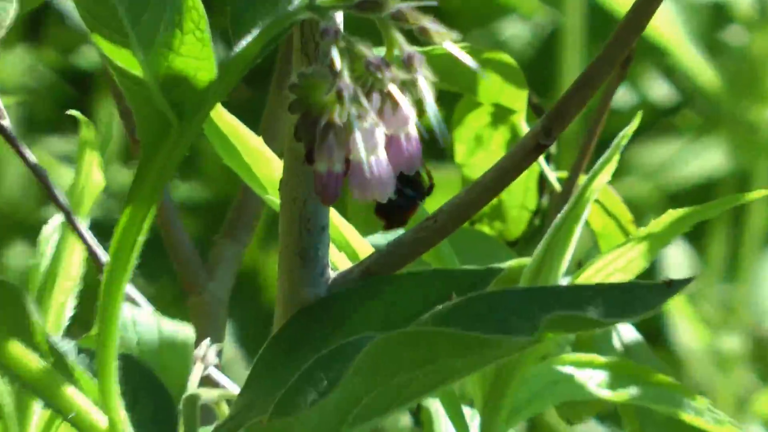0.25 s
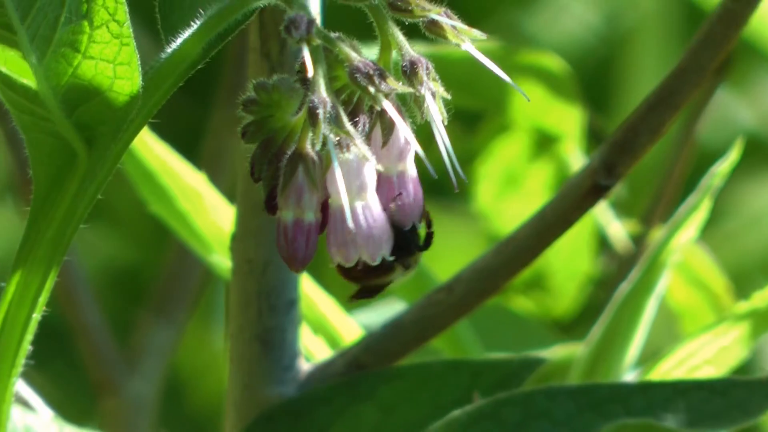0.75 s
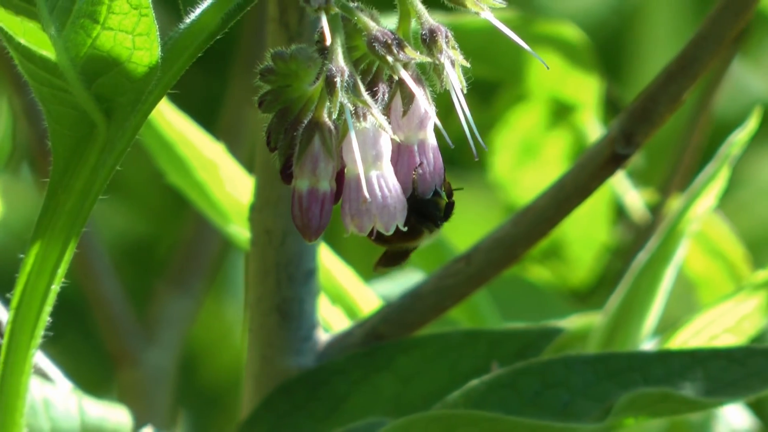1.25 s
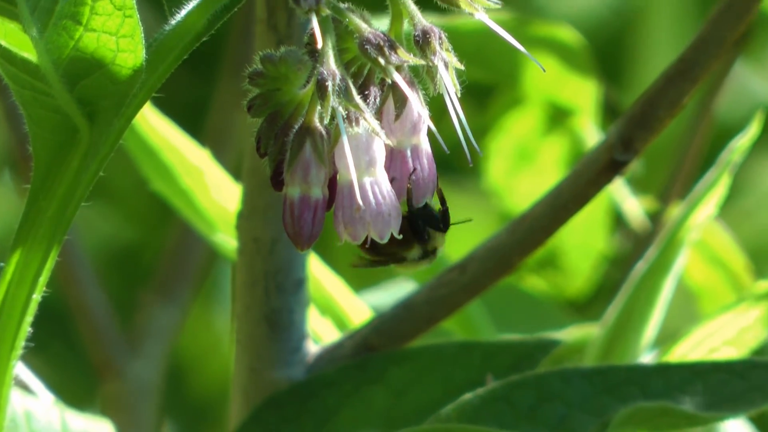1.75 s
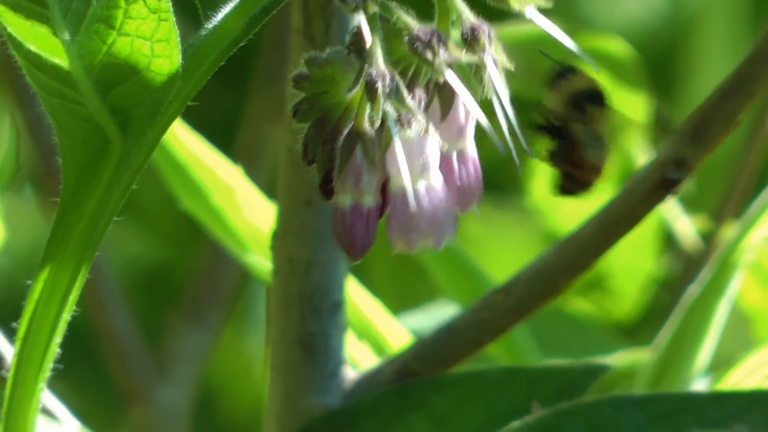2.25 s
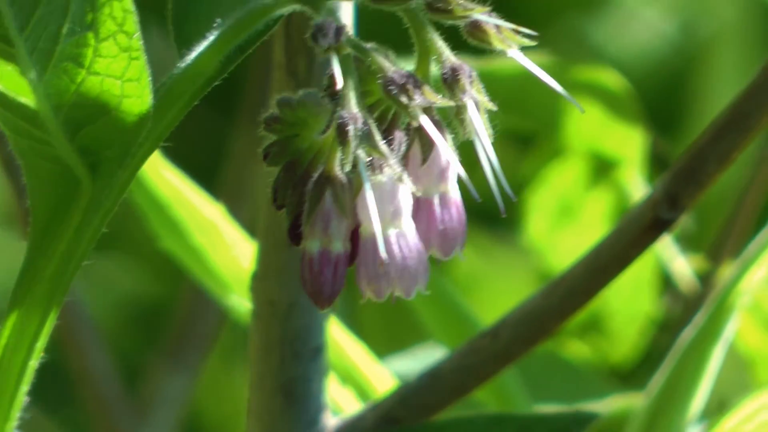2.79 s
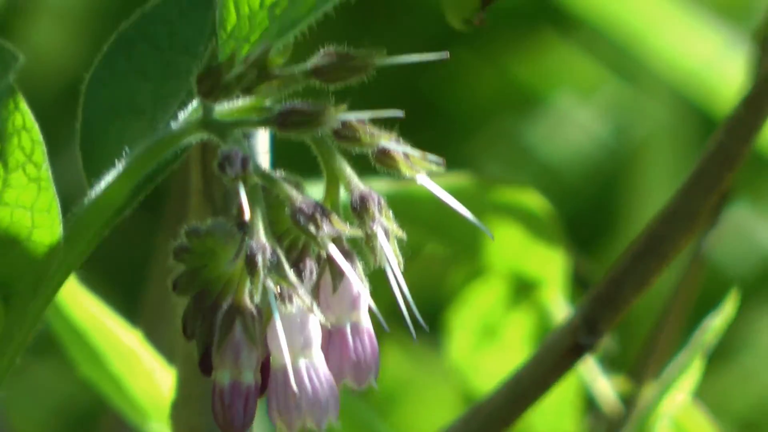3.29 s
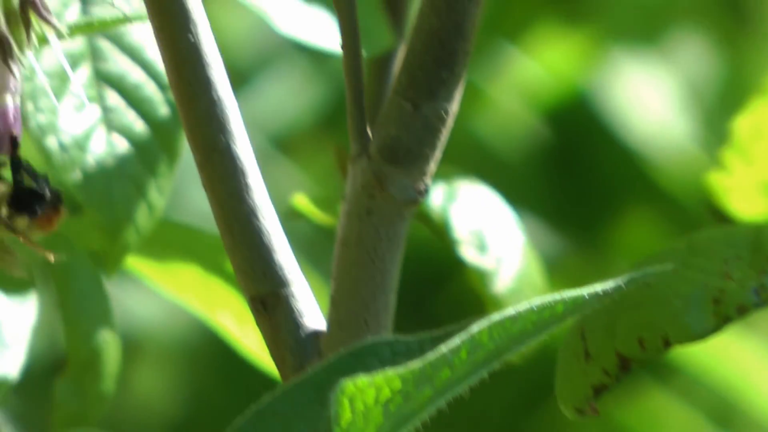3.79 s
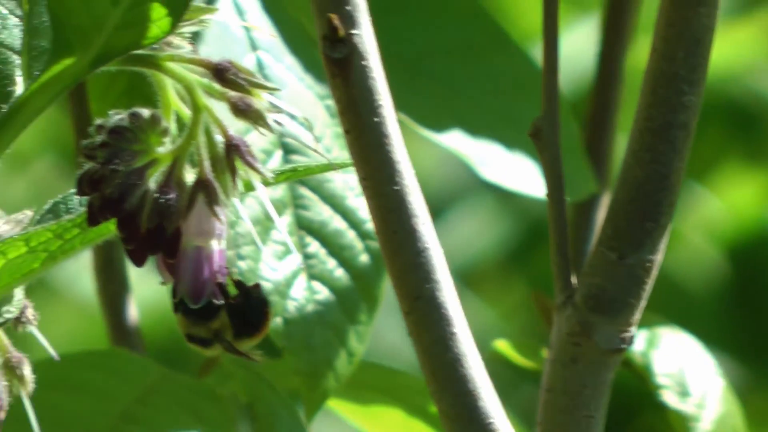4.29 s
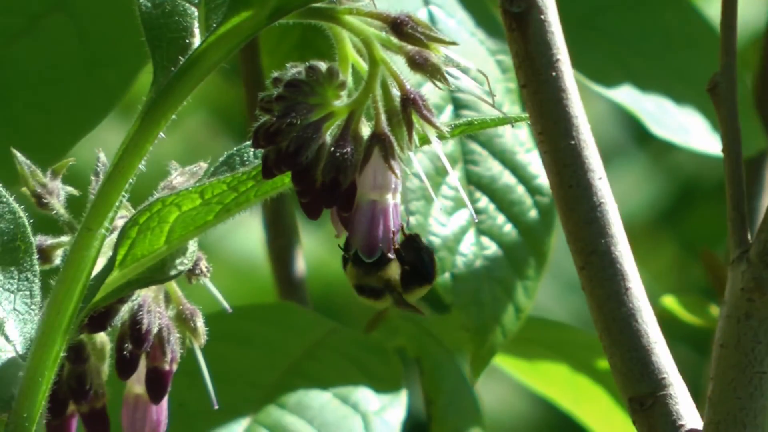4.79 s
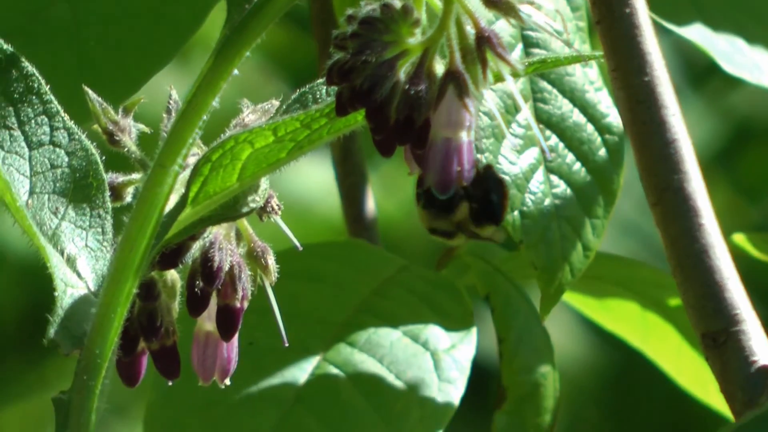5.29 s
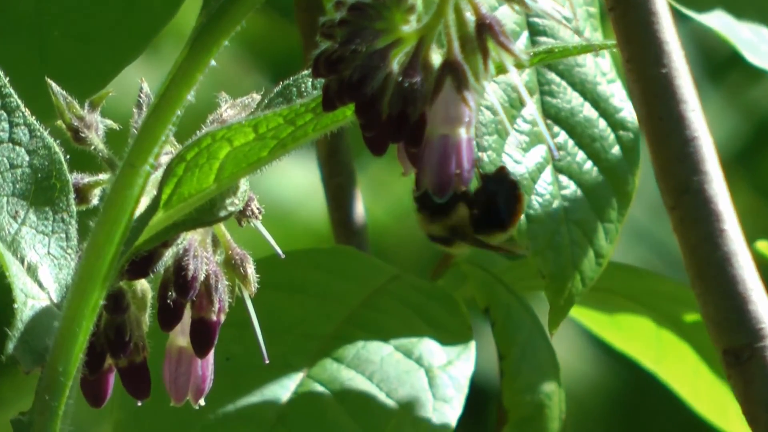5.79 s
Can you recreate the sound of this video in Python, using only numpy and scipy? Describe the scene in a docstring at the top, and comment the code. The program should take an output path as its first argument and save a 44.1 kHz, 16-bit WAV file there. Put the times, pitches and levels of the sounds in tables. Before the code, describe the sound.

Bumblebee wings hum in near-pure tones, flight after flight, while a small bird warbles quick whistles on the right and leaves rustle.

```python
"""A flower garden: bumblebees hum in one flight after another, their wings sounding almost pure tones.
A small bird warbles in gliding whistles on the right and others answer from further off;
the foliage scatters their notes into many small echoes. Petals and leaves rustle as bursts of uneven snaps.
Under it all lie a distant rumble with faint tones in it, and the soft hiss of open air, both shaped from noise."""
import sys
import numpy as np
from scipy import signal
from scipy.fft import rfft, irfft, next_fast_len
from scipy.io import wavfile

SR = 44100
rng = np.random.default_rng(int(sys.argv[2]) if len(sys.argv) > 2 else 0)


def to_wav(sig):
    """Store sig (one row per channel, or 1-D mono) as 16-bit WAV at the path in sys.argv[1].

    Samples outside -1..1 are clipped; the rate is SR.
    """
    pcm = np.clip(np.atleast_2d(sig), -1, 1) * 32767
    pcm = np.round(pcm).astype(np.int16)
    wavfile.write(sys.argv[1], SR, pcm.T)  # frames by channels


N = 266540
TIME = np.arange(N) / SR   # s


def from_db(db):
    """Logarithmic level: decibels to amplitude gain."""
    return 10 ** (np.asarray(db) / 20)


def rms_one(x):
    """Power normalisation: scale to an rms of one."""
    return x / np.sqrt(np.mean(x ** 2) + 1e-20)


def in_time(rows):
    """Linear interpolation: the columns of a curve, at every sample."""
    seconds, *columns = np.transpose(rows)
    return [np.interp(TIME, seconds, column) for column in columns]


def at_hz(rows, hz):
    """Logarithmic frequency scale: the columns of a spectrum, joined along it."""
    points, *columns = np.transpose(rows)
    return [np.interp(np.log(hz + 1), np.log(points), column) for column in columns]


def drift(rate):
    """Low-passed noise: smooth chance that turns about rate times a second, with an rms of one."""
    size = next_fast_len(N, True)
    hz = np.fft.rfftfreq(size, 1 / SR)
    spectrum = rfft(rng.standard_normal(size)) * np.exp(-(hz / rate) ** 2)
    return rms_one(irfft(spectrum, size)[:N])


def span(start, length):
    """Normalised time: the samples of an event and its progress from 0 to 1."""
    at = np.flatnonzero((TIME >= start) & (TIME < start + length))
    return at, (TIME[at] - start) / length


# Harmonic series of a hum: (multiple of the fundamental, level/dB)
HARMONICS = [(1, 1.5), (2, -28), (3, -31), (4, -27)]


def hum(fundamental_hz, waver):
    """Harmonic synthesis: a slightly unsteady tone, almost a sine, with weak overtones."""
    unsteady_hz = fundamental_hz * (1 + waver * drift(24.6))
    phase = 2 * np.pi * np.cumsum(unsteady_hz) / SR
    out = np.zeros(N)
    for multiple, level_db in HARMONICS:
        out += from_db(level_db) * np.sin(multiple * phase + rng.uniform(0, 2 * np.pi))
    return np.sqrt(2) * out


def flight(track, trim_db, fade_s):
    """Amplitude and frequency modulation: one bee's hum follows its wingbeat and nearness, faded at the ends."""
    beat_hz, level_db = in_time(track)
    outside_s = np.maximum(track[0][0] - TIME, TIME - track[-1][0])
    fade = np.clip(1 - outside_s / fade_s, 0, 1)
    return from_db(level_db + trim_db) * fade * hum(beat_hz, waver=0.0026)


# Wing hum along each flight: (t/s, wingbeat f/Hz, level/dB before the flight's trim)
HIGH_FLIGHT = [(0.0, 180.9, -27.5), (0.56, 181.2, -39), (0.688, 181, -32), (0.878, 181.7, -43),
               (1.072, 179.8, -35.5), (1.1, 179.6, -54)]
RISING_FLIGHT = [(1.27, 138.2, -45), (1.362, 137.7, -32.5), (1.688, 145.1, -42), (1.81, 148, -31),
                 (1.82, 147.7, -56)]
TAKE_OFF = [(1.96, 152.9, -43), (1.974, 153, -31), (2.17, 151.5, -39)]
LOW_FLIGHT = [(2.62, 116.3, -43), (2.712, 116, -36), (2.858, 116.6, -37), (2.972, 111, -41),
              (3.226, 112.4, -52), (3.292, 105.2, -34), (3.396, 102.4, -49.5), (3.552, 98.56, -38),
              (3.986, 100.7, -33.5), (4.308, 99.5, -36), (4.448, 97.1, -34), (4.48, 97, -51)]


def bees():
    """Periodic air displacement: beating wings push the air back and forth, a little to the right."""
    wings = flight(HIGH_FLIGHT, trim_db=-.5, fade_s=.07)
    wings += flight(RISING_FLIGHT, trim_db=-4.0, fade_s=0.075)
    wings += flight(TAKE_OFF, trim_db=-2.5, fade_s=.04)
    wings += flight(LOW_FLIGHT, trim_db=-1.0, fade_s=0.059)
    return np.outer(from_db([-3, 0]), wings)


FALL_CURVE = 2.5   # power of the progress


def fall(u):
    """Accelerating glide: level at first, then ever steeper."""
    return u ** FALL_CURVE


def slide(u):
    """Linear glide: the pitch moves evenly."""
    return u


SWOOP_SHARE = .7   # share of the length spent moving


def swoop(u):
    """Saturating glide: a quick move that levels out."""
    return np.sin(np.pi / 2 * np.minimum(u / SWOOP_SHARE, 1)) ** 2


DIP_TURN, DIP_BACK = .36, .78   # shares of the length at the far pitch and at the fullest recovery
DIP_REST = .22                  # share of the depth that stays at the recovery


def dip(u):
    """Reversing glide: straight to the far pitch, a rounded return most of the way, then a sag."""
    recovery = np.sin(np.pi / 2 * (u - DIP_TURN) / (DIP_BACK - DIP_TURN))
    return np.where(u < DIP_TURN, u / DIP_TURN, 1 - (1 - DIP_REST) * recovery)


def arch(u):
    """Half-sine glide: up and back again."""
    return np.sin(np.pi * u)


CHIP_CURVE = 1.45   # power of the progress


def chip(u):
    """Accelerating glide: a rise that steepens."""
    return u ** CHIP_CURVE


LOUDEST = .57   # share of a note's length before its loudest point


def whistles(syllables, flutter_db, waver, peakiness):
    """Frequency modulation: each note is a pure tone gliding along its contour, swelling and dying away."""
    out = np.zeros(N)
    flutter = from_db(flutter_db * drift(220))
    wobble = 1 + waver * drift(230)
    for contour, notes in syllables:
        for start, length, from_hz, to_hz, level_db in notes:
            at, u = span(start, length)
            hz = (from_hz + (to_hz - from_hz) * contour(u)) * wobble[at]
            tone = np.sin(2 * np.pi * np.cumsum(hz) / SR)
            swell = np.sin(np.pi / 2 * np.interp(u, [0, LOUDEST, 1], [0, 1, 0]))
            out[at] += from_db(level_db) * rms_one(swell ** peakiness * flutter[at] * tone)
    return out


def foliage(x, t60, count):
    """Multiple scattering: stems and leaves return many small decaying echoes, different ones to each ear."""
    ears = []
    for ear in range(2):
        delay_s = rng.uniform(0.0036, .5, count)
        size = rng.standard_normal(count)
        echoes = np.zeros(SR)
        echoes[(delay_s * SR).astype(int)] = size * from_db(-60 * delay_s / t60)
        ears.append(signal.fftconvolve(x, echoes / np.linalg.norm(echoes))[:N])
    return np.array(ears)


# Near bird's syllables by contour:
# (t/s, length/s, first f/Hz, f/Hz the contour heads for, level/dB before the ear gains)
FALLS = [(.118, .042, 4400, 3050, -39), (.238, .037, 4680, 4000, -41.5), (.275, .027, 4480, 4200, -40),
         (.515, .035, 4000, 2700, -39), (.57, .02, 3000, 2100, -41), (5.153, .036, 3430, 2100, -40),
         (5.603, .041, 3850, 3020, -34.3), (5.806, .044, 3980, 3000, -33.5),
         (5.906, .044, 3920, 2480, -33.7)]
SLIDES = [(.052, .028, 3850, 4500, -44), (.158, .025, 3700, 4000, -41), (.362, .036, 2880, 3700, -37),
          (.472, .022, 3750, 5100, -45), (.594, .041, 2900, 3880, -36), (.718, .017, 4100, 5450, -43.5),
          (.788, .02, 2870, 3250, -42), (.815, .032, 4650, 3250, -37), (5.466, .036, 2130, 3280, -35),
          (5.498, .024, 3200, 2100, -35), (5.516, .02, 3150, 2300, -37.5), (5.978, .077, 2520, 2920, -31)]   # most of them upwards
SWOOPS = [(.49, .027, 4750, 3990, -36), (.729, .027, 5450, 3950, -37), (5.233, .035, 2900, 3830, -36.5)]
DIPS = [(5.35, .054, 3720, 2980, -35), (5.69, .052, 3250, 2520, -31.5)]
# Strength of all its reflected sound, from deep in the leaves to an open perch: (t/s, level/dB)
COVER = [(1, 1.5), (5, -2)]
# Its distinct reflections: (delay t/s, left level/dB, right level/dB), on top of the cover
REFLECTIONS = [(.023, -13, -9), (.047, -15, -8)]


def near_bird():
    """Direct and reflected sound: two quick warbled phrases, two reflections and a scattered tail."""
    syllables = [(fall, FALLS), (slide, SLIDES), (swoop, SWOOPS), (dip, DIPS)]
    song = whistles(syllables, flutter_db=2.3, waver=.005, peakiness=1.1)
    direct = np.outer(from_db([-1.5, 3]), song)
    returned = song * from_db(in_time(COVER)[0])
    reflected = np.zeros((2, N))
    for delay_s, *ears_db in REFLECTIONS:
        late = np.interp(TIME - delay_s, TIME, returned, left=0)
        reflected += np.outer(from_db(ears_db), late)
    tail = from_db([[-10], [-.5]]) * foliage(returned, t60=.7, count=600)
    return direct + reflected + tail


# Far birds' low warbles: (t/s, length/s, first f/Hz, f/Hz the contour heads for, level/dB before the ear gains)
FAR_DIPS = [(3.392, .075, 2880, 2200, -48.5), (3.512, 0.069, 2903, 2356, -47)]
FAR_SWOOPS = [(3.106, .029, 4740, 3150, -47), (3.883, .075, 2850, 2150, -46), (4.018, .06, 2490, 2165, -47),
              (4.495, 0.039, 2680, 2480, -48), (4.55, .075, 2830, 2173, -47.5),
              (4.693, 0.036, 2650, 2530, -49.5), (.486, .06, 2540, 2400, -49.5),
              (.895, .045, 2740, 2596, -47.5)]
# Notes that rise and sink back: (t/s, length/s, top f/Hz, level/dB before the ear gains)
ARCHES = [(.03, 0.034, 2240, -57), (0.339, 0.057, 2530, -44.5), (.975, .06, 2980, -55),
          (1.59, 0.056, 5550, -56.5), (3.339, 0.06, 2744, -49), (3.494, 0.056, 2945, -54),
          (3.85, 0.053, 2790, -51.5), (4.748, .06, 4330, -47), (4.907, 0.047, 4005, -46),
          (5.033, 0.064, 4350, -45), (5.036, 0.057, 4140, -49)]
ARCH_DEPTH = 0.078   # share of the top pitch by which both ends lie lower
# Short rising chips: (t/s, first f/Hz, level/dB before the ear gains)
CHIPS = [(1.747, 4070, -51.5), (1.863, 4000, -50.5), (1.978, 3800, -49), (2.106, 3900, -49.5),
         (4.45, 4880, -53), (4.592, 4100, -49), (4.64, 3650, -49), (4.699, 3760, -50), (4.876, 4050, -54)]
CHIP_S, CHIP_RISE = 0.0304, 0.184   # length in s; rise as a share of the first pitch
# A thin repeated whistle: (t/s, length/s, first f/Hz, level/dB before the ear gains)
PIPES = [(2.44, 0.063, 3710, -53.5), (2.77, 0.18, 3720, -54.5), (3.115, .04, 3680, -52),
         (3.169, .07, 3607, -48.5), (3.268, .06, 3130, -54), (3.92, .1, 3640, -59), (4.26, .3, 3620, -59)]
PIPE_SAG_HZ_PER_S = 660


def far_birds():
    """Reverberant blurring: echoes smear low warbles, arched notes, chips and a thin, slightly sagging whistle."""
    arches = [(s, length, top * (1 - ARCH_DEPTH), top, db) for s, length, top, db in ARCHES]
    chips = [(s, CHIP_S, hz, hz * (1 + CHIP_RISE), db) for s, hz, db in CHIPS]
    pipes = [(s, length, hz, hz - PIPE_SAG_HZ_PER_S * length, db) for s, length, hz, db in PIPES]
    syllables = [(dip, FAR_DIPS), (swoop, FAR_SWOOPS), (arch, arches), (chip, chips), (slide, pipes)]
    song = whistles(syllables, flutter_db=1.0, waver=.002, peakiness=.45)
    echoes = from_db([[-6], [6.5]]) * foliage(song, t60=0.57, count=700)
    return np.outer(from_db([-2, 9.3]), song) + echoes


# One thin dipping call: (t/s, length/s, first f/Hz, lowest f/Hz, level/dB before the ear gains)
HIGH_CALL = [(2.4, 0.045, 7330, 6700, -33.5)]


def high_call():
    """Absorption: one thin note far to the right, whose echoes the leaves soak up quickly."""
    call = whistles([(dip, HIGH_CALL)], flutter_db=0.0, waver=.012, peakiness=0.81)
    echoes = from_db([[-19], [-10]]) * foliage(call, t60=.22, count=200)
    return np.outer(from_db([-20, -2]), call) + echoes


# Rustles of petals and leaves: (t/s, length/s, level/dB before the ear gains, tilt/dB per octave above 1 kHz)
RUSTLES = [(.204, .0076, -38.5, 4), (.213, .02, -42.5, 3), (0.724, 0.017, -43, 2), (1.28, 0.072, -45, -9),
           (1.429, .035, -49, -2), (1.55, .068, -43, -6), (1.661, 0.071, -40, -7), (1.775, .045, -48, 2),
           (2.19, .015, -49, 9), (2.238, .028, -46, 14), (2.295, .01, -48, 7), (5.052, 0.083, -45, -8),
           (5.443, .036, -47, -1), (5.885, 0.21, -41.5, -13)]
# Their common spectrum, before each one's tilt: (f/Hz, relative level/dB per Hz)
RUSTLE_COLOUR = [(600, -35), (2000, -25), (4500, 10), (7500, 9.5), (11000, 3.5), (15500, -14)]
RUSTLE_ATTACK = 0.44   # below 1, a rustle peaks early and trails off


def rustles(grain_db):
    """Frictional noise: brief brushes of leaf and petal as tiny uneven snaps, some duller and some airier."""
    out, size = np.zeros((2, N)), SR // 4
    hz = np.fft.rfftfreq(size, 1 / SR)
    colour_db, = at_hz(RUSTLE_COLOUR, hz)
    octaves = np.log2(np.maximum(hz, 1000))
    snaps = rms_one(rng.standard_normal((2, N)) * from_db(grain_db * drift(500)))
    for start, length, level_db, tilt_db in RUSTLES:
        at, u = span(start, length)
        colour = rms_one(from_db(colour_db + tilt_db * octaves))
        burst = irfft(rfft(snaps[:, at], size) * colour, size)[:, :len(at)]
        out[:, at] += from_db(level_db) * np.sin(np.pi * u ** RUSTLE_ATTACK) * burst
    return from_db([[-2.5], [1.5]]) * out


# Faint tones in the distant rumble: (t/s, length/s, f/Hz, level/dB before the overtone and ear gains)
FAR_DRONES = [(-0.27, 1.38, 205, -42), (-0.55, 1.14, 56, -46), (-0.44, 1.83, 124, -43), (2, 2.1, 333, -51),
              (3.5, 0.974, 204, -43)]
DRONE_FADE = 0.76   # power of the half-sine swell


def far_drones():
    """Amplitude modulation: faint hums that swell and fade in the distant rumble."""
    out = np.zeros(N)
    for start, length, hz, level_db in FAR_DRONES:
        at, u = span(start, length)
        swell = np.abs(np.sin(np.pi * u)) ** DRONE_FADE
        out[at] += from_db(level_db) * swell * hum(hz, waver=0.01823)[at]
    return np.outer(from_db([-3, 0]), out)


# Spectrum of the open air: (f/Hz, relative level/dB per Hz)
AIR = [(20, -22), (55, -8), (95, 0), (165, -0.5), (270, -9), (450, -10), (780, -9), (1100, -17),
       (1750, -13.5), (2400, -12), (4000, -14.5), (6000, -21.5), (8500, -29), (14500, -35.5), (15700, -44)]
# Hollows in that spectrum: (centre f/Hz, width f/Hz, level/dB)
HOLLOWS = [(492, 17, -6), (642, 14, -13.5), (913, 70, -7.5), (1003, 39, -4.5), (1176, 28, -7),
           (1296, 60, -8.5), (1560, 71, -9)]
# Stereo image of the air: (f/Hz, left-right likeness 0-1, left ear level/dB relative to the right)
IMAGE = [(60, 0.97, -3), (176, 0.75, -5), (288, 0, -5.5), (620, .1, -11.5), (1300, 0.32, -7.5),
         (3000, 0.4, -13.5), (8200, 0.26, -9.5), (10900, 0, -22), (15000, .3, -16)]
# Slow swell of the air at the right ear: (t/s, rumble level/dB, hiss level/dB before its flicker)
SWELL = [(0, -34, -35), (.6, -36.5, -35.5), (1.2, -35, -35.5), (2.3, -36, -36), (3.3, -35, -35.5),
         (4.2, -36, -36.5), (5, -37, -35.5), (6.04, -36, -35)]


def open_air(split_hz, flicker_db):
    """Interaural coherence: noise, most alike between the ears in the low rumble and less so in the hiss."""
    hz = np.fft.rfftfreq(N, 1 / SR)
    colour_db, = at_hz(AIR, hz)
    for centre, width, db in HOLLOWS:
        colour_db = colour_db + db * np.exp(-((hz - centre) / width) ** 2)
    right, other = rfft(rng.standard_normal((2, N))) * from_db(colour_db)
    alike, left_db = at_hz(IMAGE, hz)
    alike = np.clip(alike, 0, 1)
    left = from_db(left_db) * (alike * right + np.sqrt(1 - alike ** 2) * other)
    both = np.array([left, right])
    low_share = 1 / (1 + (hz / split_hz) ** 4)
    rumble, hiss = irfft(both * low_share, N), irfft(both * (1 - low_share), N)
    rumble_db, hiss_db = in_time(SWELL)
    hiss_db = hiss_db + flicker_db * drift(6.5)
    return from_db(rumble_db) * rumble / rumble[1].std() + from_db(hiss_db) * hiss / hiss[1].std()


def scene():
    """Superposition: bees, birds, leaves and air add up."""
    birds = near_bird() + far_birds() + high_call()
    background = far_drones() + open_air(split_hz=460, flicker_db=0.6)
    return bees() + birds + rustles(grain_db=3.0) + background


CUTOFF_HZ = 15750


def record(dry):
    """Band limiting: a steep elliptic low-pass cuts the top."""
    low_pass = signal.ellip(12, .1, 90, CUTOFF_HZ, fs=SR, output="sos")   # order, ripple dB, stopband dB
    return signal.sosfilt(low_pass, dry)


dry = scene()
out = record(dry)
to_wav(out)
```